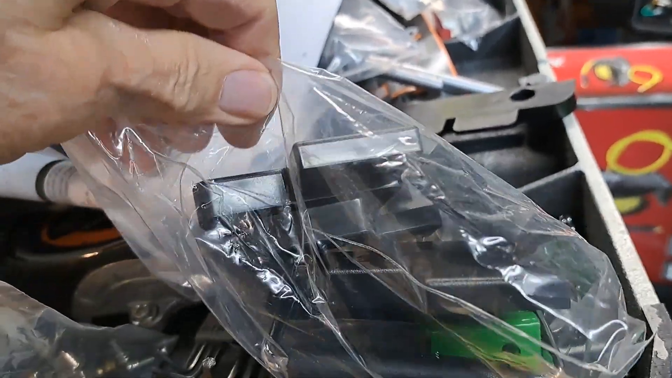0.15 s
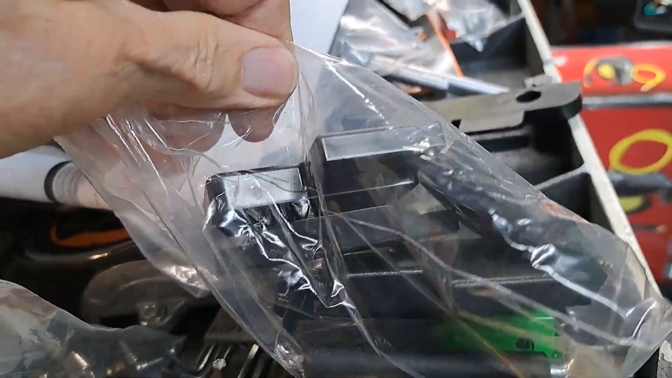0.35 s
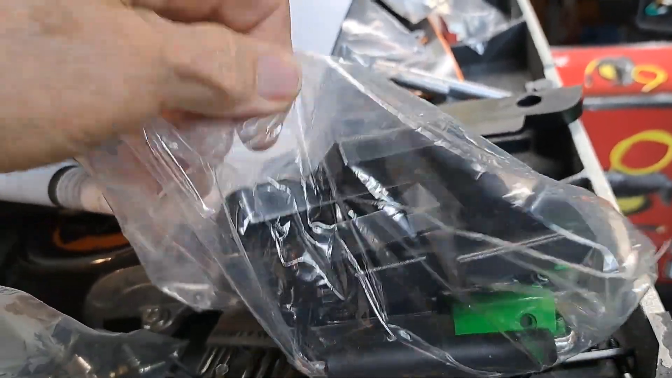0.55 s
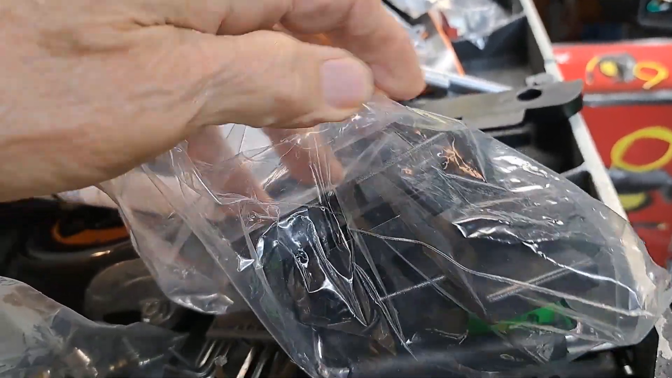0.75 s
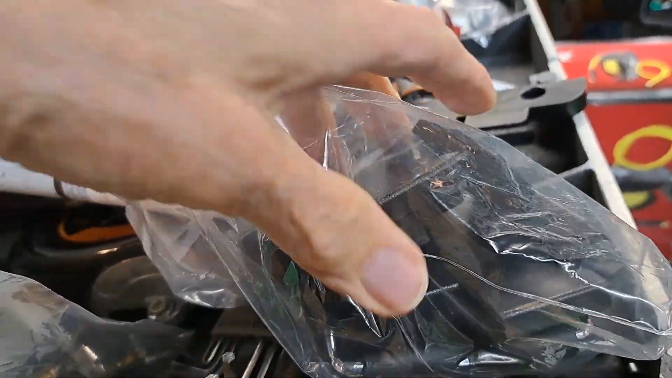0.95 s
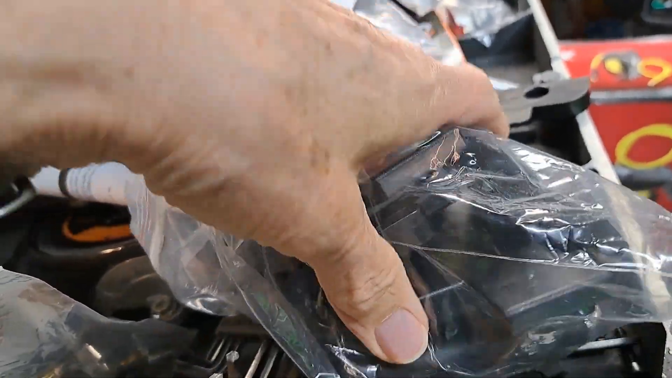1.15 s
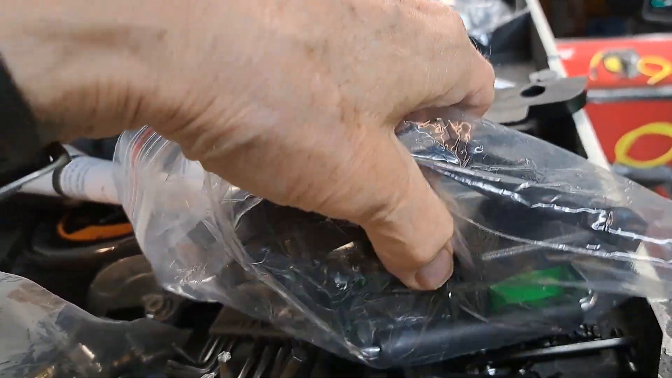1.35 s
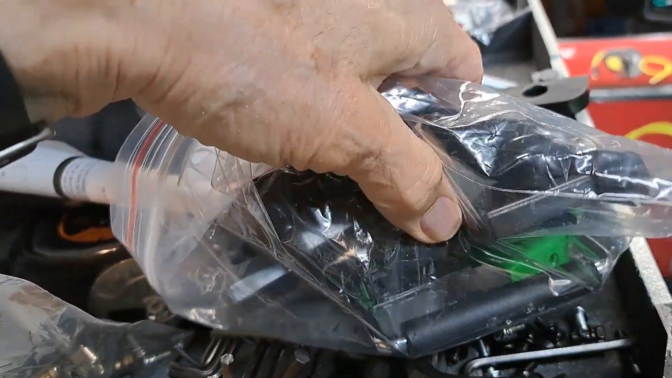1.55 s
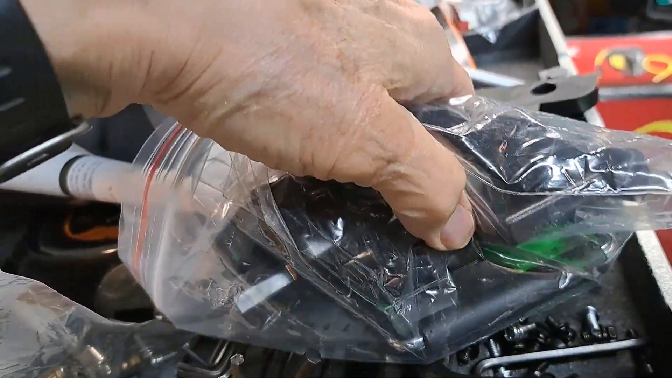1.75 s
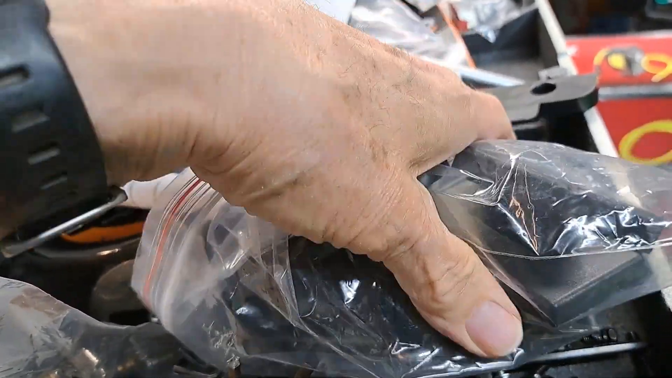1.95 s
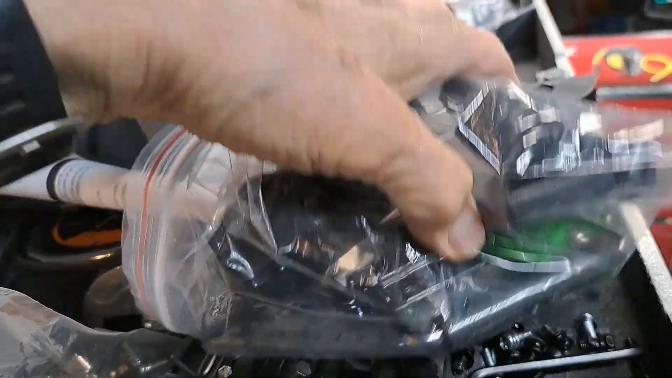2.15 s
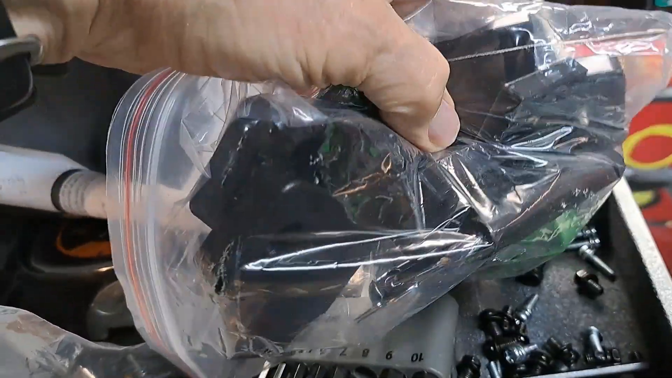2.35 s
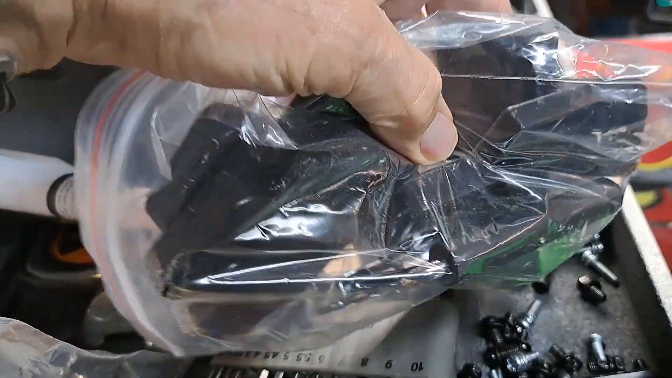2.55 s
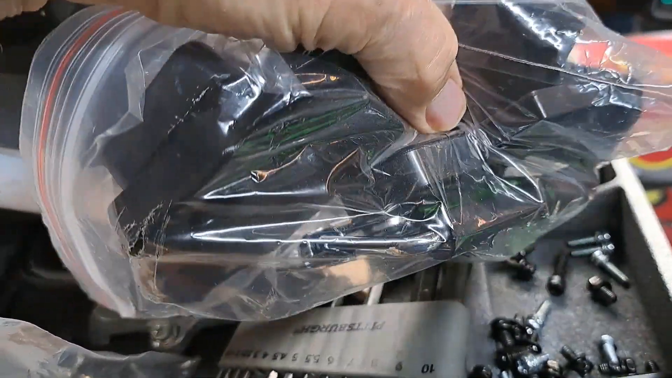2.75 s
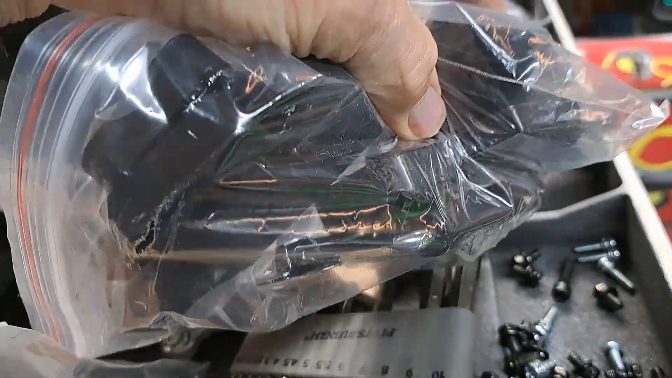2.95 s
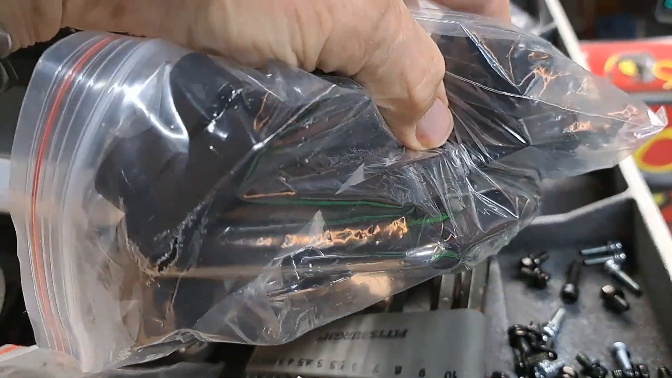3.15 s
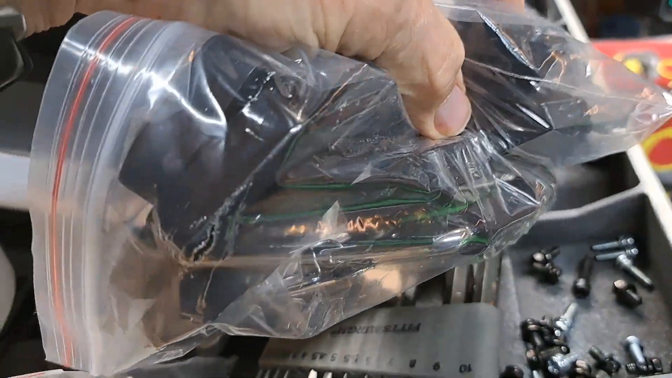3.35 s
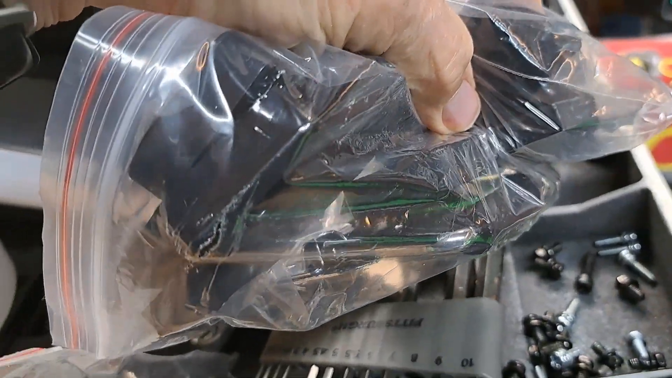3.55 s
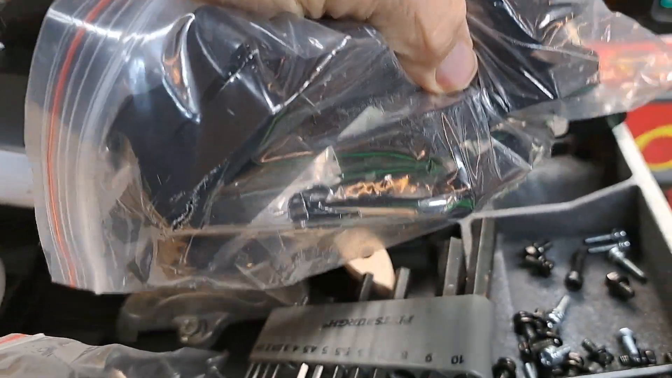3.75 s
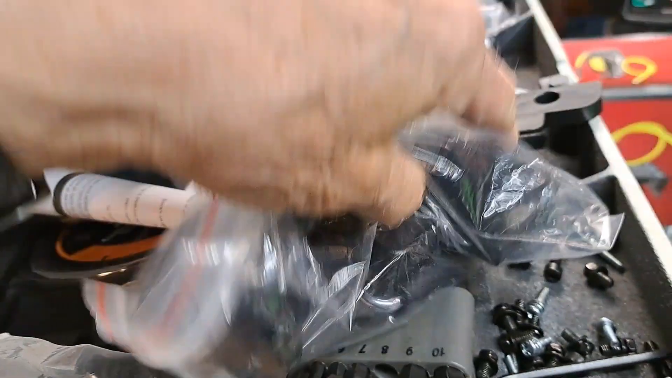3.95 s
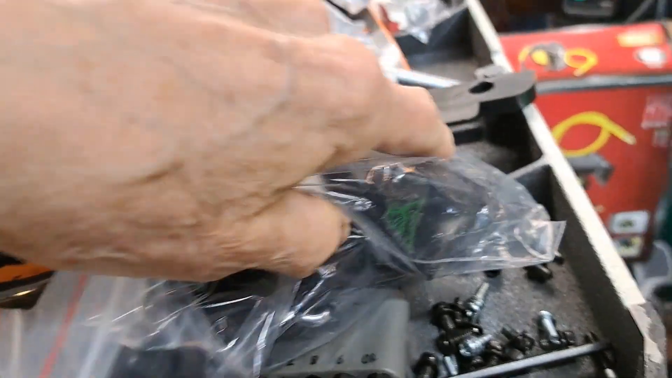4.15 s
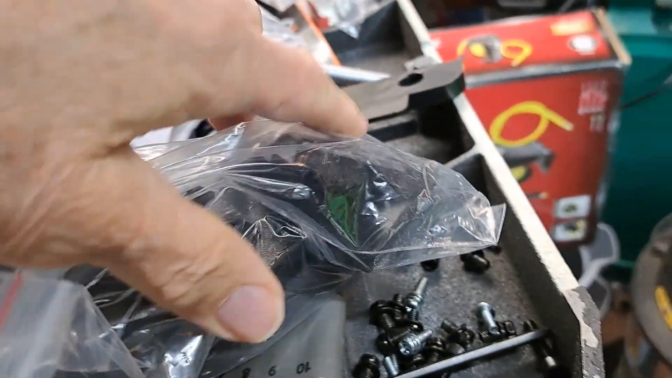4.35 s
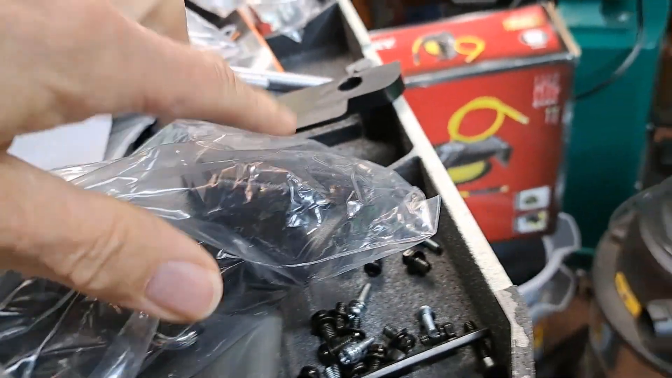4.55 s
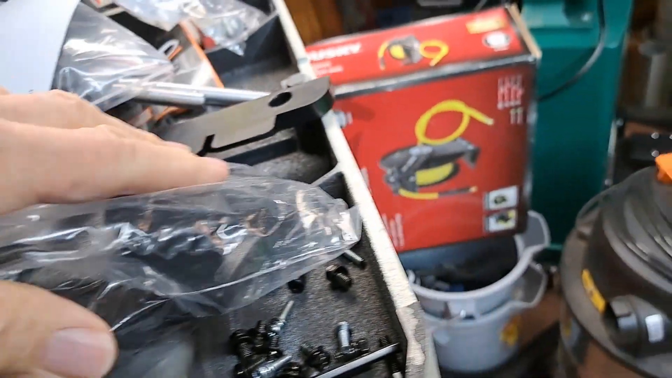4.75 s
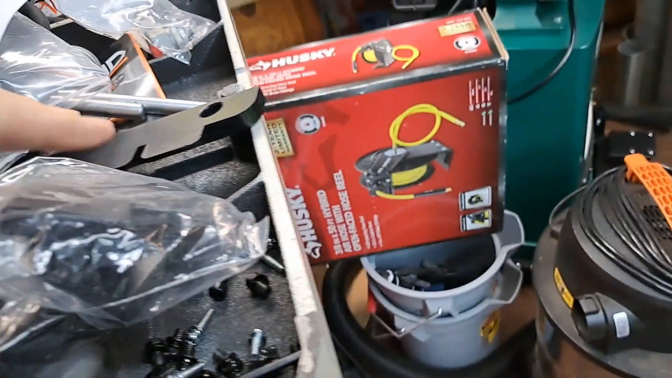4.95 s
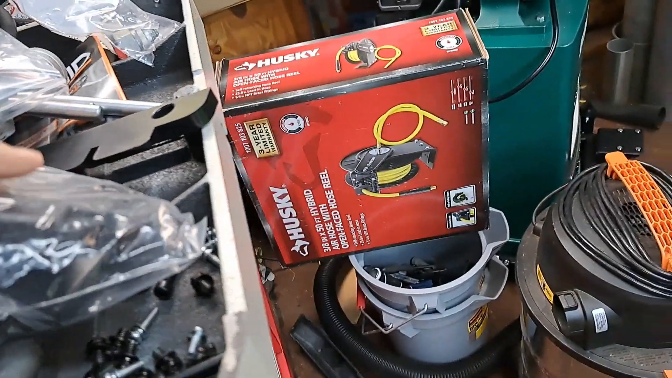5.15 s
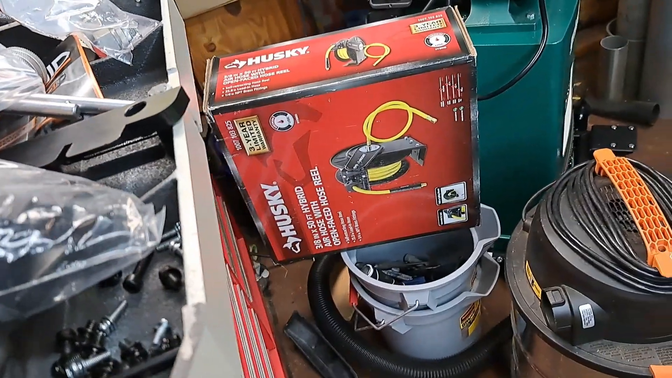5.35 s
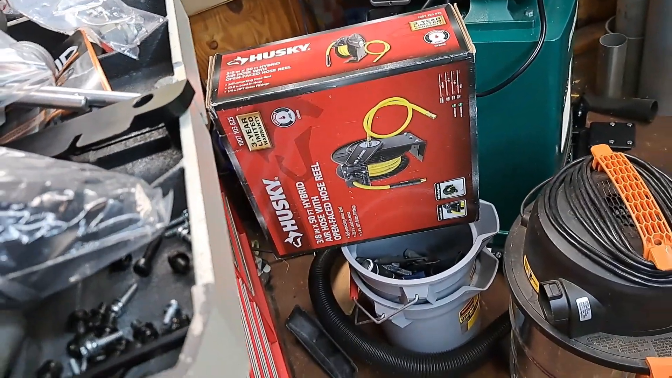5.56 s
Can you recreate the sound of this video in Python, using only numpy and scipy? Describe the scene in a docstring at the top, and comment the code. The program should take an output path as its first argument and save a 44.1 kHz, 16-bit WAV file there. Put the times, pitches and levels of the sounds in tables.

```python
"""A plastic bag of hard parts crinkles as a hand grips, lifts and sets it down on a workshop bench.
Creases in the film pop over in sharp snaps above a dense rustle; inside, the parts knock, ring and slide.
Under them sit a soft handling rumble, short reflections from the bench and quiet room air.
A phone's two microphones hear it close up, each in its own colour, the left one a little earlier."""
import sys
import numpy as np
from scipy import signal
from scipy.fft import rfft, irfft, next_fast_len
from scipy.io import wavfile
from scipy.ndimage import uniform_filter1d, map_coordinates

SR = 44100
rng = np.random.default_rng(int(sys.argv[2]) if len(sys.argv) > 2 else 0)


def unload_audio(sound):
    """Save the sound as a 16-bit wav file, at the path given as the first command line argument."""
    columns = np.transpose(np.atleast_2d(sound))
    # keep every value between -1 and 1, then stretch to whole-number steps
    steps = np.round(np.clip(columns, -1, 1) * 32767)
    wavfile.write(sys.argv[1], SR, steps.astype(np.int16))


N = 251325
TIME_S = np.arange(N) / SR

# Featured creases: start_s, level_db, body_db (relative to the crack)
SNAP_CUES = [(0.0225, -6, -11.5), (0.1107, -16, -15.0), (0.137, -21, -24), (0.1624, 0.5, -19.5),
             (0.1874, -13.5, -12.0), (0.2051, -14.0, -10), (0.2144, -17, -6), (0.225, -15, -23),
             (0.3048, -15.5, -5), (0.33, -13.5, -11.5), (0.3506, -14.5, -7), (0.364, -19, -14),
             (0.4117, -9, -8), (0.4214, -7.5, -11), (0.4406, -21, -21), (0.4648, -11, -12),
             (0.5298, -15, -6), (0.6997, -9.5, -17.0), (0.778, -8, -23), (0.7855, -3.5, -11.5),
             (0.8233, -14, -10.5), (0.842, -17, -14), (0.855, -18.0, -7.5), (0.8754, -10.5, -6.5),
             (0.891, -16, -14), (0.991, -18, -5.5), (1.0767, -9.5, -12), (1.156, -13.5, -15.5),
             (1.1766, -12.0, -10), (1.1825, -9.5, -18), (1.2224, -9, -17), (1.2948, -6.0, -6),
             (1.3683, -10.5, -18), (1.4476, -4, -26), (1.4815, -7.5, -11.5), (1.504, -5, -14),
             (1.55, -8.5, -13), (1.576, -5.5, -10.5), (1.6365, -4.5, -17), (1.6627, -19, -6),
             (1.7206, -15, -7.5), (1.7484, -11, -11), (1.7585, -8.5, -21), (1.8006, -8.5, -12),
             (1.8346, -8.5, -11), (1.8645, -10, -12), (1.9168, -7.5, -9), (1.9863, -14.5, -11),
             (2.0305, -9, -2), (2.0996, -8.5, -20), (2.1283, -6, -17), (2.1683, -5.5, -13.5),
             (2.2075, -3.5, -18), (2.3714, -13, -9), (2.4164, -18, -3.5), (2.4408, -10, -9.5),
             (2.4498, -11.5, -8), (2.4845, -12, -11.5), (2.5153, -18.5, -6), (2.5497, -12.5, -12),
             (2.5798, -10.0, -20.5), (2.5901, -17, -18.0), (2.5969, -12.5, -6), (2.6993, -12.5, -6),
             (2.7104, -2.5, -13.5), (2.7836, -9.5, -9), (2.8054, -13, -27), (2.8215, -13, -6),
             (2.83, -10, -16.0), (2.8595, -8, -19), (2.869, -8, -8.5), (2.892, -15, -11.0),
             (2.9103, -24.5, 4.5), (2.937, -15, -12.5), (3.0201, -9, -10), (3.0525, -13.5, -14),
             (3.0696, -15, -6.0), (3.12, -18.0, -2.5), (3.2058, -24, -1), (3.2272, -27, -12),
             (3.234, -16.5, -5.5), (3.3002, -20.5, -21), (3.383, -32, -8.5), (3.4472, -27, -2.0),
             (3.5205, -41.5, 10), (3.597, -29.5, 5.5), (3.6243, -12.0, -23), (3.6315, -23, -4.5),
             (3.6837, -29.5, -12), (3.7058, -23, -15.5), (3.7188, -18.5, -3), (3.7943, -8, -18.5),
             (3.882, -14.5, -14.5), (3.9012, -25, 3), (3.936, -3.5, -15), (3.946, -8.5, -25),
             (4.0365, -17, -14), (4.0885, -22, -21), (4.1328, -20.5, -23), (4.1601, -25.5, -8.0),
             (4.1764, -18, -15.5), (4.195, -24, -12), (4.3558, -15, -13), (4.4155, -12.5, -21),
             (4.5119, -13, -16), (4.7494, -19.5, 1.5), (4.8196, -29, -3), (4.864, -28, -19),
             (5.1774, -26, -9), (5.2337, -25, -9.5), (5.2932, -32.5, -15.0), (5.4261, -27.5, -10.5)]
def snaps():
    """Single creases pop over and stand out from the rustle."""
    return creases(*np.transpose(SNAP_CUES), samples=1200)


# Bright crack of the film: freq_hz, level_db
CRACK_SPECTRUM = [(1470, -32.5), (2500, -11), (4850, -9.5), (7980, -3.5), (9490, -9.5), (14700, 3.5),
                  (15500, -3.5), (16500, -23)]
# Darker body of the sheet: freq_hz, level_db
BODY_SPECTRUM = [(240, -36.5), (400, -18.5), (975, -9), (1460, 4), (4500, -13), (5850, -33), (9900, -120)]
def creases(start_s, level_db, body_db, samples):
    """Each crease gives, cracks within a millisecond, then the sheet flutters briefly."""
    t = np.arange(samples) / SR
    stretch = np.exp(0.25 * rng.standard_normal((len(start_s), 1)))
    pan_db = 1.9 * rng.standard_normal(len(start_s))
    flutter = amp(-22.5) * decay(t, 0.035 * stretch)
    crack_env = (decay(t, 0.0043 * stretch) + flutter) * attack(t, 0.00052)
    body_env = decay(t, 0.0086 * stretch) * attack(t, 0.0007)
    crack = burst(crack_env, CRACK_SPECTRUM, alike=0.53, tint_db=3)
    body = amp(body_db)[:, None] * burst(body_env, BODY_SPECTRUM, alike=0.63, tint_db=4)
    return place(start_s, amp(level_db)[:, None] * (crack + body), pan_db)


def rustle(film_db):
    """Clumps of small creases, few strong and many faint, over the hiss of film sliding on film."""
    when, faintness, body = rng.random((1500, 3)).T
    at = (when * N).astype(int)
    clump = wobble(40)
    level_db = film_db[at] + 12.5 + 2.5 * clump[at] - 3.5 * np.log(faintness + 0.12)
    swarm = creases(at / SR, level_db, body_db=8 * body - 15, samples=400)
    hiss = coloured(noise_pair(alike=0), CRACK_SPECTRUM)
    return swarm + amp(film_db - 11.5 + 4 * clump) * hiss


# Parts striking each other: start_s, level_db, pitch_hz
KNOCK_CUES = [(0.017, -23, 300), (0.1432, -16, 2410), (0.6235, -8, 2110), (1.2585, 1.5, 2140),
              (1.272, -9, 1990), (1.309, -5, 1675), (1.4413, -6.5, 2004), (1.4811, -5.5, 1934),
              (1.4904, -8, 1830), (1.6617, -17.5, 2040), (1.947, -3.5, 1768), (2.019, -7, 1875),
              (2.166, -0.5, 1723), (2.205, -7, 1880), (2.226, -2, 1910), (2.235, -5, 2080),
              (2.3272, -16, 1746), (2.858, -34, 303), (3.817, -27, 1587), (3.978, -6, 1580),
              (3.979, -20.5, 490), (3.9899, 4, 2070), (4, -6.5, 1845), (4.0136, -8.5, 3740),
              (4.361, -16, 1860), (4.4363, -17.5, 1995), (4.442, -20, 687), (4.4478, -22, 1505),
              (4.455, -25.5, 384), (4.69, -29, 166), (4.7317, -11.5, 2435), (4.748, -19, 2410),
              (5.0723, -22, 2254), (5.0735, -24.5, 3700)]
# Modes of a part: pitch_ratio, level_db, t60_s (for a part pitched at 2 kHz)
PART_MODES = [(1, 2.5, 0.031), (1.13, -3, 0.016), (1.65, -14.5, 0.015)]
# Clack of the contact: freq_hz, level_db
CLACK_SPECTRUM = [(150, -29.5), (450, -12), (2500, 6), (6000, -5.5), (15000, -8)]
def knocks():
    """Each blow clacks and rings a part's damped modes; low parts speak softer and ring longer."""
    start_s, level_db, pitch_hz = np.transpose(KNOCK_CUES)[..., None]
    t = np.arange(1800) / SR
    ring = 0
    for ratio, mode_db, t60_s in PART_MODES:
        strength, detune, phase = rng.standard_normal((3, len(start_s), 1))
        waver = 0.05 * np.cumsum(rng.standard_normal((len(start_s), len(t))), axis=1)
        mode_hz = ratio * pitch_hz * (1 + 0.015 * detune)
        tone = np.sin(2 * np.pi * mode_hz * t + phase + pitch_hz / 2000 * waver)
        ring += amp(mode_db + 1.1 * strength) * decay(t, t60_s * (2000 / pitch_hz) ** 0.36) * tone
    ring *= amp(level_db - 6) * attack(t, 1.6 / pitch_hz) ** 2
    clack_env = np.ones_like(pitch_hz) * decay(t, 0.019) * attack(t, 0.00072)
    clack = burst(clack_env, CLACK_SPECTRUM, alike=0.95, tint_db=2)
    clack *= amp(level_db - 10) * np.clip(pitch_hz / 1500, 0, 1)
    return place(start_s[:, 0], ring + clack, pan_db=np.zeros(len(start_s)))


# Hollow resonances of the parts: centre_hz, width_hz, level_db
HOLLOW_RESONANCES = [(720, 1000, -14.5), (1590, 290, -4), (1833, 213, 1), (2222, 536, -3.5),
                     (3580, 550, -6), (7440, 21000, -20)]
def sliding(parts_db, grip):
    """Parts grind together: lumpy friction noise through their hollow resonances."""
    def hollow(hz):
        return sum((-1) ** k * amp(db) * 1j * hz * width / (centre ** 2 - hz ** 2 + 1j * hz * width)
                   for k, (centre, width, db) in enumerate(HOLLOW_RESONANCES))
    friction = amp(3.84 * wobble(150) + 2.58 * grip) * noise_pair(alike=0.54)
    return amp(parts_db) * unit(filtered(friction, hollow))


# Squeezes and shifts of the bag: peak_s, hold_s, film_db, parts_db
SQUEEZE_CUES = [(0.0, 0.017, -30, -36.5), (0.06, 0.14, -40, -40.5), (0.363, 0.14, -44.5, -40.5),
                (0.604, 0.056, -31.5, -25), (0.733, 0.19, -41.5, -44.5), (1.092, 0.062, -44, -38.5),
                (1.226, 0.039, -36, -30.5), (1.311, 0.011, -24.5, -23.5), (1.387, 0.12, -34, -38),
                (1.454, 0.014, -29.5, -28), (1.59, 0.024, -31, -29.5), (1.756, 0.15, -35.5, -42),
                (1.938, 0.016, -39, -22.5), (2.018, 0.012, -33.5, -31), (2.166, 0.081, -29.5, -24),
                (2.282, 0.05, -30.5, -29.5), (2.608, 0.026, -42, -38), (2.701, 0.26, -47, -61),
                (2.847, 0.017, -43, -42), (3.029, 0.05, -52.5, -52.5), (3.21, 0.0095, -51, -49.5),
                (3.641, .011, -62, -53), (3.728, 0.0098, -61, -61), (3.815, 0.18, -61, -55),
                (3.971, 0.0089, -26, -32), (4.152, 0.16, -50.5, -55.5), (4.358, 0.0036, -54, -39.5),
                (4.452, 0.0035, -42.5, -31), (4.527, 0.062, -53, -54), (4.618, 0.048, -62, -57),
                (5.177, 0.066, -70, -66), (5.339, 0.036, -67, -58)]
# Parts tumbling with almost no build-up: peak_s, hold_s, film_db, parts_db
TUMBLE_CUES = [(1.254, 0.0092, -34, -17.5), (3.978, 0.013, -47, -18.5), (4.727, 0.012, -41.5, -33),
               (5.069, 0.0099, -54.5, -41)]
def handling():
    """Level rides in dB for film and parts: each move rises, holds, falls fast, then creeps faintly."""
    peak_s, hold_s, film_db, parts_db = np.transpose(SQUEEZE_CUES + TUMBLE_CUES)[..., None]
    is_tumble = np.arange(len(peak_s))[:, None] >= len(SQUEEZE_CUES)
    t = np.arange(0, N + 64, 64) / SR
    before_s = np.maximum(peak_s - t, 0)
    after_s = np.maximum(t - peak_s - hold_s, 0)

    def ride(level_db, rise_db_per_s, fall_db_per_s, creep_db, creep_db_per_s):
        rise = amp(level_db - np.where(is_tumble, 2500.5, rise_db_per_s) * before_s)
        fall = amp(-fall_db_per_s * after_s)
        creep = amp(creep_db - creep_db_per_s * after_s)
        power = np.sum(rise ** 2 * (fall ** 2 + creep ** 2), axis=0)
        return np.interp(TIME_S, t, 10 * np.log10(power + 1e-12))
    return (ride(film_db, rise_db_per_s=296.5, fall_db_per_s=319, creep_db=-10.5, creep_db_per_s=107),
            ride(parts_db, rise_db_per_s=283, fall_db_per_s=269, creep_db=-22.5, creep_db_per_s=98.5))


# Low end of the handling: freq_hz, level_db
RUMBLE_SPECTRUM = [(15, -50.5), (25, -12), (55, -2), (149, 3.5), (438, 0.5), (628, -7), (1170, -15),
                   (1980, -120)]
# Rumble bed between squeezes: time_s, level_db
RUMBLE_BED = [(0, -45.5), (0.3, -49), (1.05, -49.5), (2.2, -51), (2.799, -52.5), (3.298, -59.5),
              (4.297, -55), (4.58, -58), (4.7, -56), (4.999, -62.5), (5.7, -63)]
def rumble(parts_db, grip):
    """Soft handling rumble that swells with the parts' level, less steeply and more slowly."""
    lumps = amp(1.2 * grip + 2.2 * wobble(25)) * noise_pair(alike=0.41)
    swell = uniform_filter1d(amp(22.5 + 0.51 * parts_db), int(0.022 * SR) + 1)
    bed = amp(np.interp(TIME_S, *np.transpose(RUMBLE_BED)))
    return bed * (1 + swell) * coloured(lumps, RUMBLE_SPECTRUM)


# Decay of the reflections: freq_hz, t60_s
BENCH_DECAY = [(500, 0.13), (3000, 0.075), (14000, 0.0045)]
def bench_reflections(sound):
    """Bench and shelves answer with a short tail whose treble dies first."""
    hz, t, bands = signal.stft(rng.standard_normal((2, SR // 4)), SR, nperseg=256)
    tail = signal.istft(bands * decay(t, along(BENCH_DECAY, hz)[:, None]), SR, nperseg=256)[1]
    predelayed = np.pad(sound, ((0, 0), (130, 0)))
    return signal.fftconvolve(predelayed, tail / np.linalg.norm(tail[0]), axes=1)[:, :N]


# Workshop air: freq_hz, level_db
AIR_SPECTRUM = [(15, -61.5), (25, -24.5), (55, -3), (266, -18.5), (651, -34.5), (2270, -34), (4480, -48),
                (13600, -40), (16500, -42)]
def room_tone():
    """Quiet air with a faint narrow whine that grows near the end."""
    air = coloured(noise_pair(alike=0.33), AIR_SPECTRUM)
    whine = unit(filtered(noise_pair(alike=0.3), lambda hz: 1 / (1 + ((hz - 2290) / 40) ** 2)))
    return amp(-63.5) * air + amp(-78) * whine * np.clip((TIME_S - 5.4) / 0.098, 0.4, 1)


def amp(db):
    return 10 ** (np.asarray(db) / 20)


def unit(x):
    return x / np.sqrt(np.mean(x ** 2) + 1e-20)


def attack(t, rise_s):
    return 1 - np.exp(-t / rise_s)


def decay(t, t60_s):
    return amp(-60 * t / t60_s)


def along(points, hz):
    """Reads a curve of (freq_hz, value) points on a log frequency axis."""
    freq_hz, values = np.transpose(points)
    return np.interp(np.log(hz + 1), np.log(freq_hz + 1), values)


def wobble(rate_hz):
    """A smooth random curve with rate_hz knots a second."""
    return map_coordinates(rng.standard_normal(int(N * rate_hz / SR) + 4), [TIME_S * rate_hz])


def filtered(x, response):
    """Applies a complex frequency response."""
    size = next_fast_len(N + 8192)
    return irfft(rfft(x, size) * response(np.fft.rfftfreq(size, 1 / SR)), size)[..., :N]


def coloured(x, spectrum):
    """Applies an EQ curve and scales to unit RMS."""
    return unit(filtered(x, lambda hz: amp(along(spectrum, hz))))


def noise_pair(alike, shape=(N,)):
    """Left and right noise with correlation `alike`."""
    mid, side = rng.standard_normal((2,) + shape)
    angle = np.arccos(alike) / 2
    mid, side = np.cos(angle) * mid, np.sin(angle) * side
    return np.array([mid + side, mid - side])


def burst(envelopes, spectrum, alike, tint_db):
    """One stereo noise burst per envelope, with that envelope's energy and its own random tint."""
    count, samples = envelopes.shape
    spectra = rfft(noise_pair(alike, envelopes.shape))
    hz = np.fft.rfftfreq(samples, 1 / SR)
    band = 7.99 * np.sqrt(hz / hz[-1])
    tint = np.array([np.interp(band, np.arange(9), knots) for knots in rng.standard_normal((count, 9))])
    wave = envelopes * irfft(spectra * amp(along(spectrum, hz) + tint_db * tint), samples)
    return wave * (np.linalg.norm(envelopes, axis=-1) / np.linalg.norm(wave, axis=-1))[..., None]


def place(start_s, waves, pan_db):
    """Mixes waves (2, events, samples), each from its own spot, slightly later on the right."""
    right_lag = np.clip(3 + 1.6 * rng.standard_normal(len(start_s)), 0, 30).astype(int)
    channels = []
    for wave, lag, side in zip(waves, (0, right_lag), (0.5, -0.5)):
        at = (np.round(start_s * SR).astype(int) + lag)[:, None] + np.arange(wave.shape[1])
        panned = wave * amp(side * pan_db)[:, None]
        channels.append(np.bincount(at.ravel(), panned.ravel(), N + SR)[:N])
    return np.array(channels)


LEFT_RIGHT = np.array([[0.5], [-0.5]])  # splits a left-minus-right amount between the channels
def scene():
    """The bag on the bench in the quiet workshop."""
    film_db, parts_db = handling()
    grip = wobble(35)  # the fingers' unsteady pressure
    bag = snaps() + rustle(film_db) + knocks() + sliding(parts_db, grip)
    pan_db = np.interp(TIME_S, (4.75, 4.82), (0, 3))  # the phone turns away: the bag shifts left
    bag *= amp(LEFT_RIGHT * pan_db)
    return bag + amp(-13) * bench_reflections(bag) + rumble(parts_db, grip) + room_tone()


# Colour of the microphone pair: freq_hz, left_minus_right_db
MIC_BALANCE = [(60, 2.5), (380, 0.5), (700, -4), (1290, -6), (2380, -9.5), (4400, 4), (8120, -1.5),
               (15000, -8.5)]
def record(dry):
    """Two close-set microphones: narrow bass, own colour and delay, soft saturation, a band limit."""
    def mic_response(hz):
        left_lead_s = 0.00015 / (1 + (1450 / (hz + 1)) ** 4)  # fades out in the bass
        phase = 2 * np.pi * hz * left_lead_s
        return amp(LEFT_RIGHT * along(MIC_BALANCE, hz)) * np.exp(1j * LEFT_RIGHT * phase)
    mid, side = (dry[0] + dry[1]) / 2, (dry[0] - dry[1]) / 2
    side = filtered(side, lambda hz: 0.36 + 0.93 / (1 + (620 / (hz + 1)) ** 4))
    mics = filtered(np.array([mid + side, mid - side]), mic_response)
    saturated = mics / (1 + mics ** 4) ** 0.25
    return filtered(saturated, lambda hz: amp(-np.clip(hz - 16000, 0, 1600) / 20) * (hz < 16800))


dry = scene()
out = record(dry)
unload_audio(out)
```